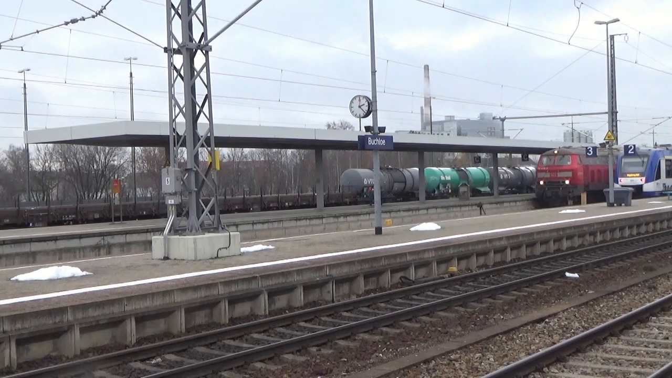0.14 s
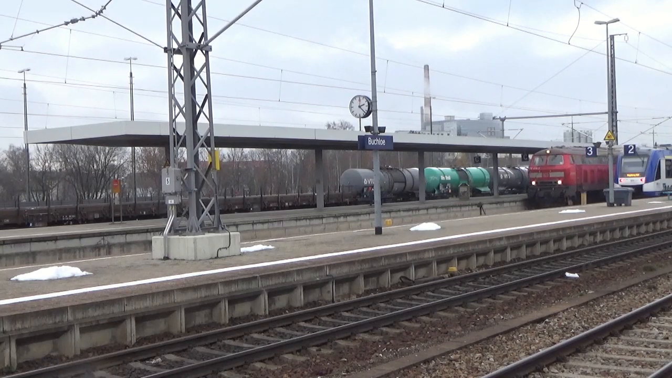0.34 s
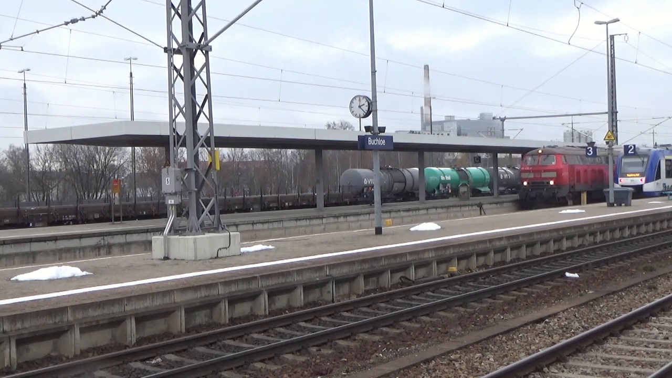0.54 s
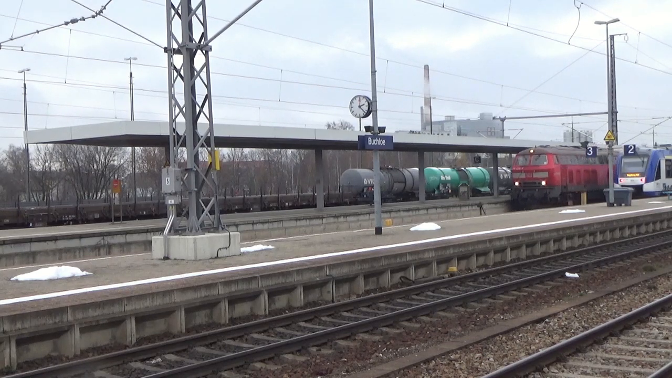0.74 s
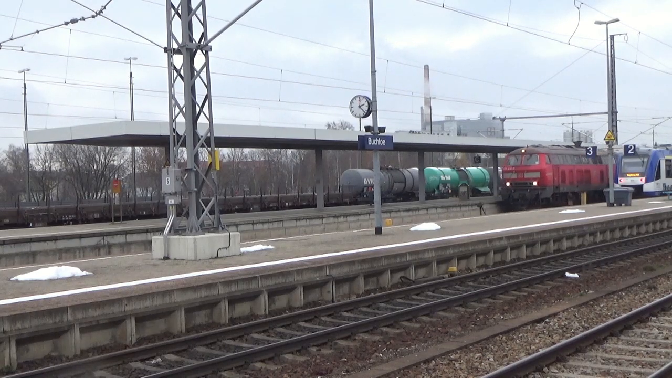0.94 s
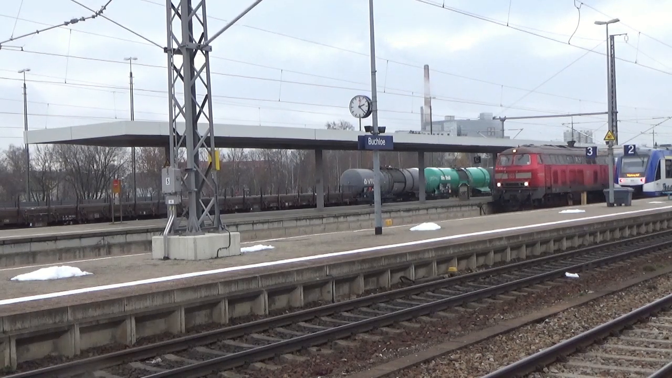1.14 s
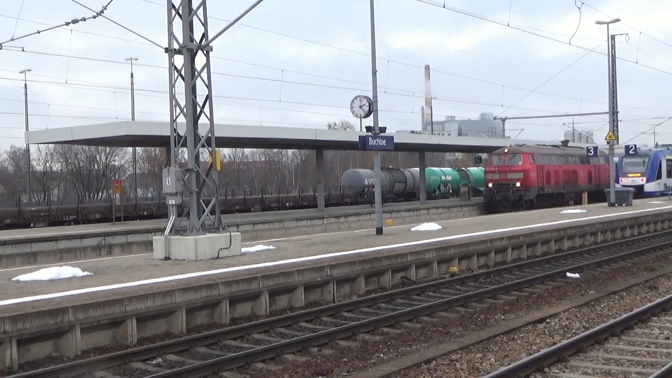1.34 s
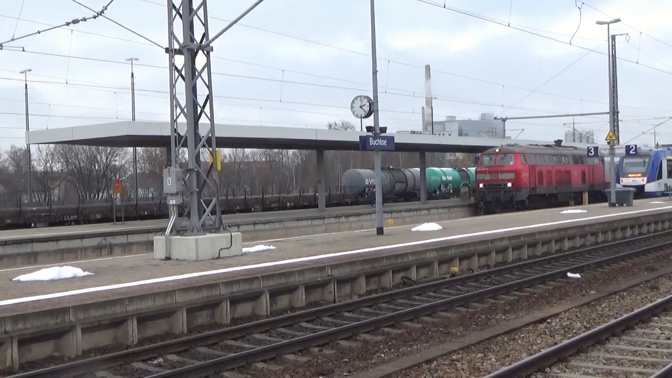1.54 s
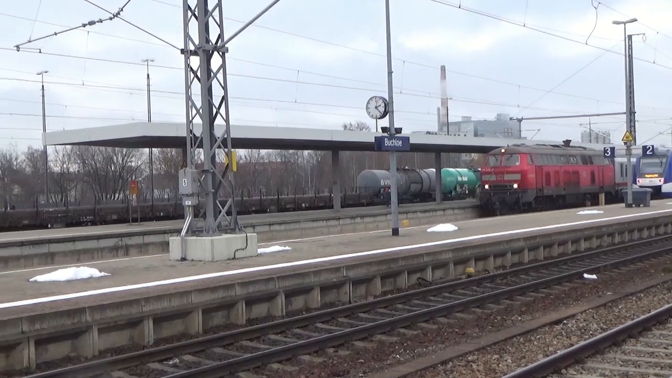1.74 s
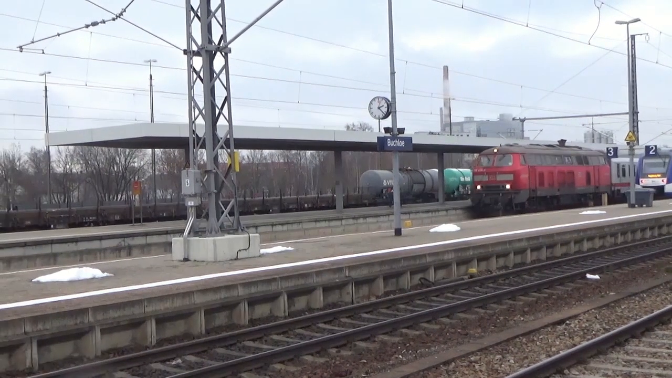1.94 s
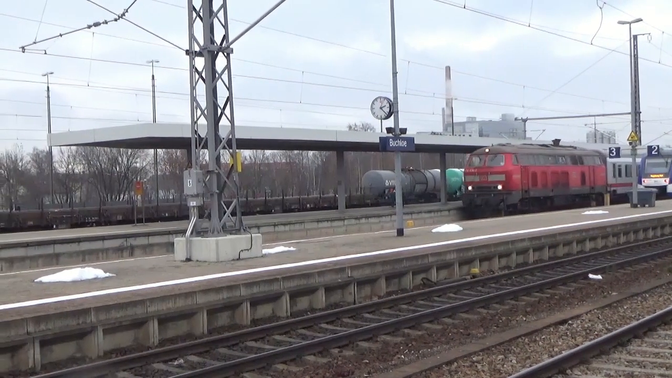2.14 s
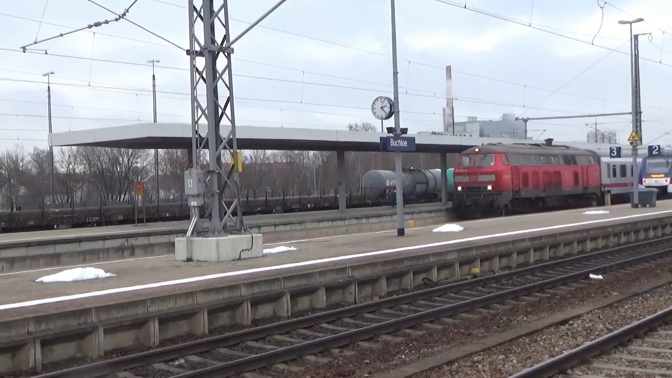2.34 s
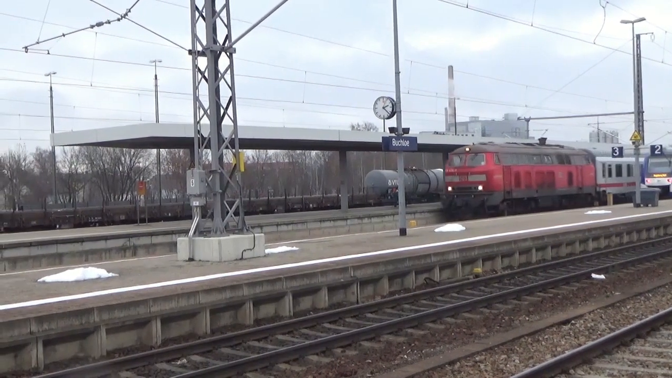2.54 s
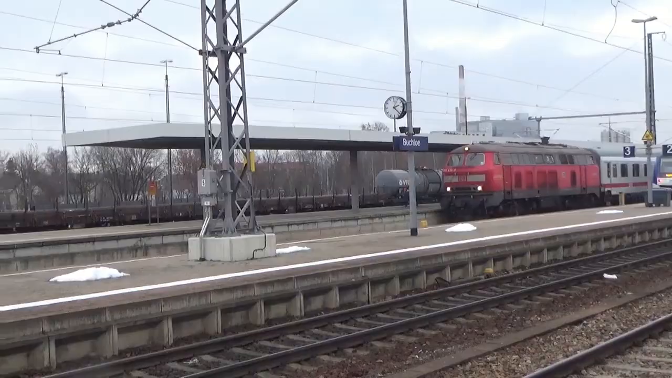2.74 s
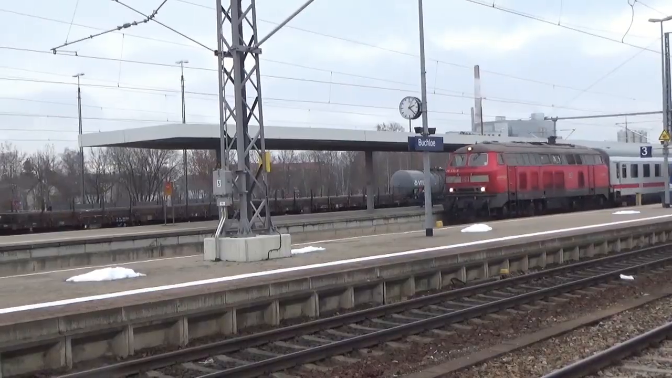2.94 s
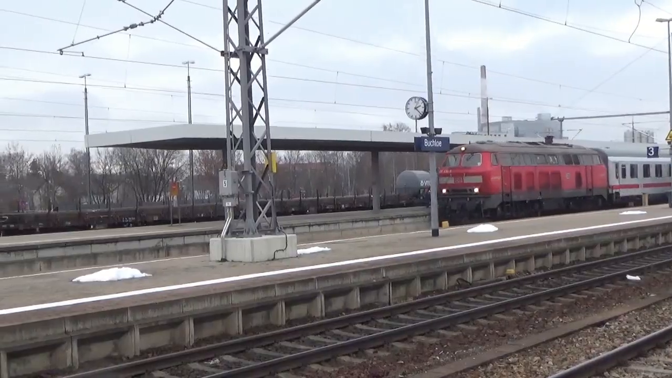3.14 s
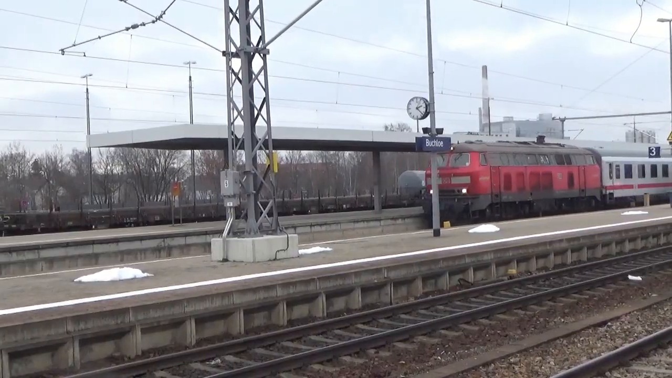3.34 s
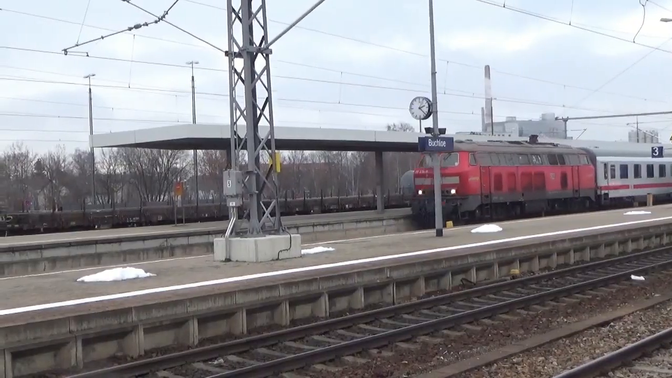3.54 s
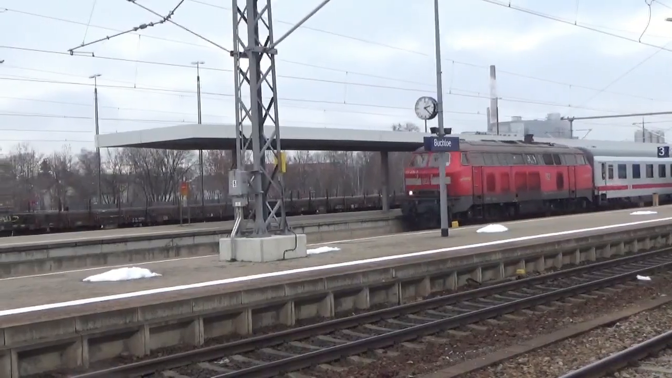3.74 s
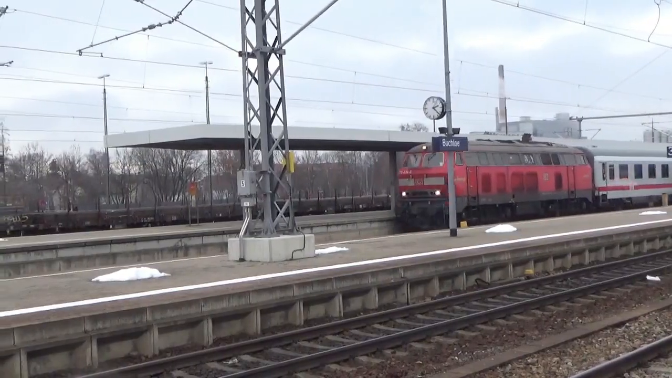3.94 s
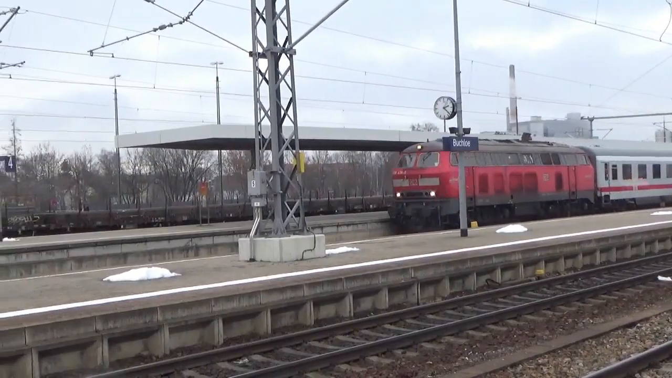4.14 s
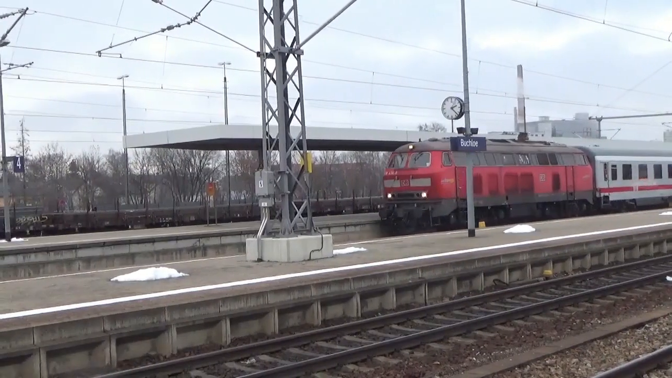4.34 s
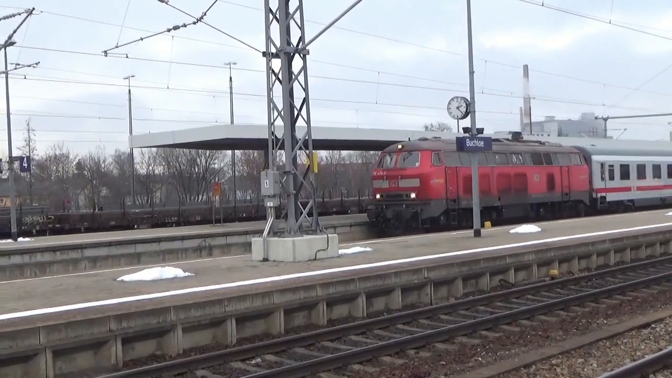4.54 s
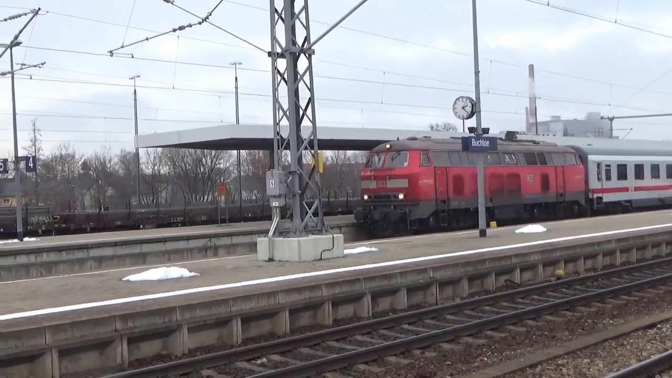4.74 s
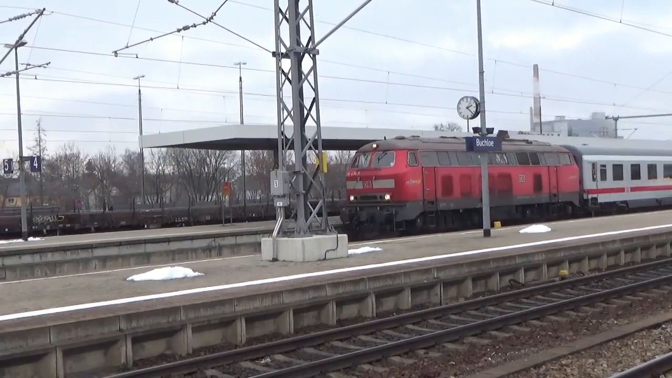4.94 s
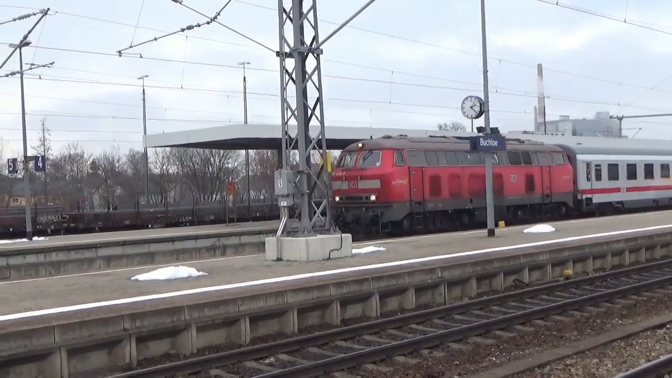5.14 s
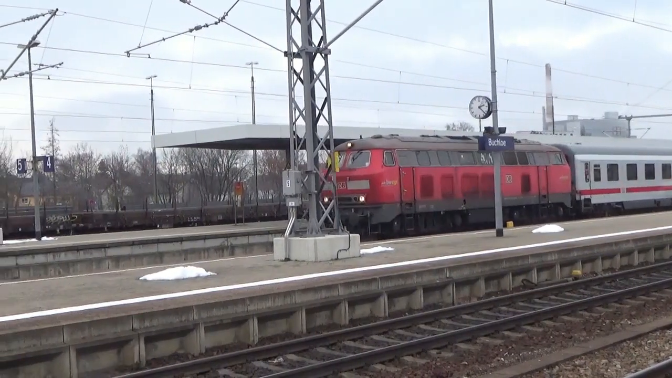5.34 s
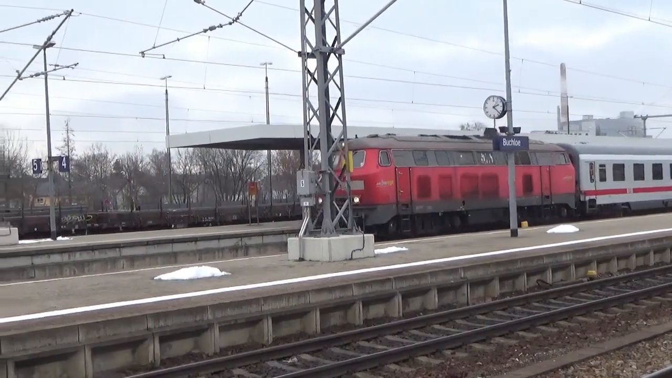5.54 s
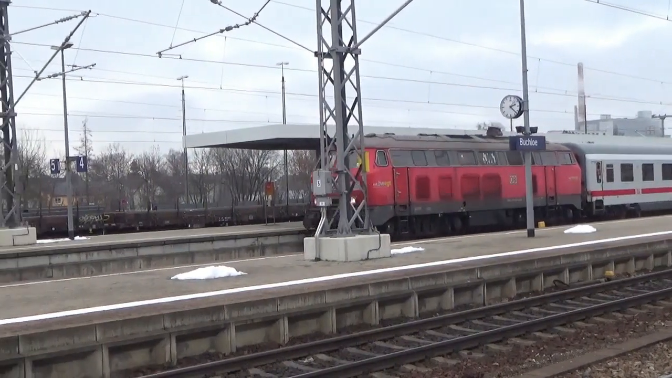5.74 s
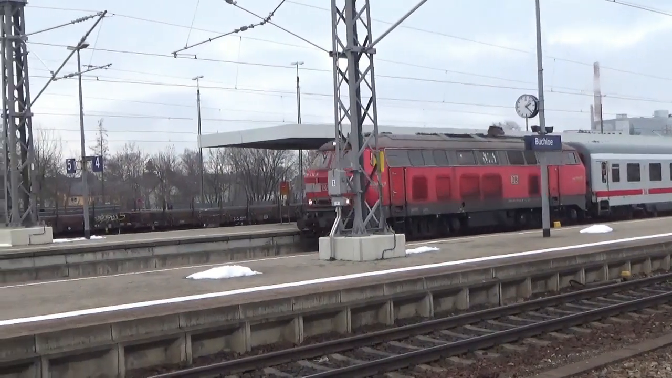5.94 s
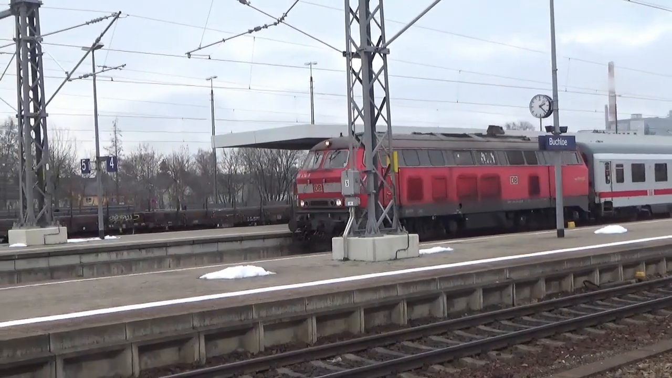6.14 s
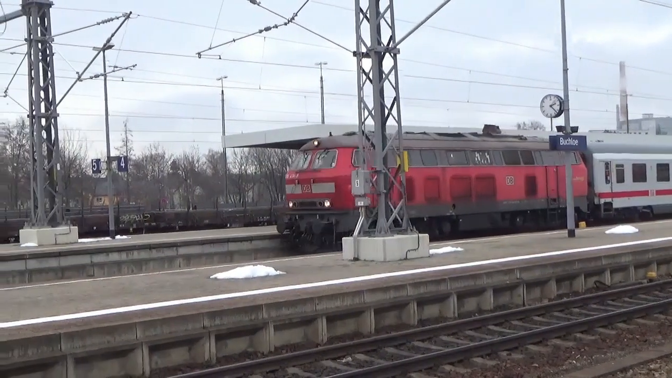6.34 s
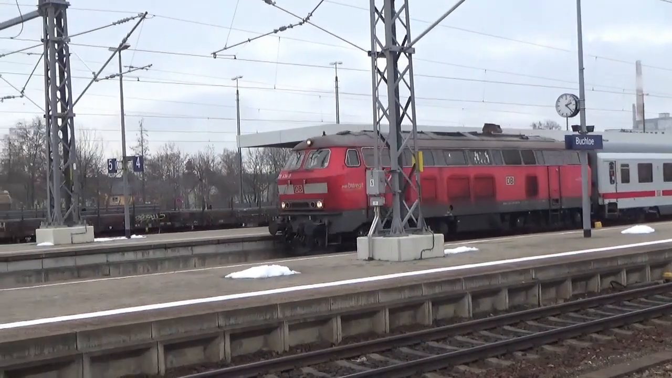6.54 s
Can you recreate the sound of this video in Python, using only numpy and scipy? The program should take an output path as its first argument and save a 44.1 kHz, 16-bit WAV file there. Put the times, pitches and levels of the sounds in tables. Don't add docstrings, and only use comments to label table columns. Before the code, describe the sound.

A diesel locomotive with coaches rolls into a station, roar growing brighter, then a piercing brake squeal flares and fades into low metallic groans.

```python
import sys
import numpy as np
from scipy import signal
from scipy.fft import rfft, irfft, next_fast_len
from scipy.io import wavfile
from scipy.ndimage import uniform_filter1d

SR = 44100
rng = np.random.default_rng(int(sys.argv[2]) if len(sys.argv) > 2 else 0)


def wav_record(signal):
    frames = np.transpose(np.atleast_2d(signal))
    bounded = np.clip(frames, -1, 1)
    quanta = np.round(bounded * 32767).astype(np.int16)
    wavfile.write(sys.argv[1], SR, quanta)


def undo_db(level):
    steps = np.asarray(level, float) / 20
    return 10 ** steps


N = 290619

# t/s, nearness/dB, treble loss at 10 kHz/dB
APPROACH = [(0, -6.5, 13), (.7, -4.5, 12.5), (1.4, -3, 12.5), (1.95, -3, 14), (2.1, -2.5, 8.5),
            (3.1, -2, 4), (3.5, -1.3, 2), (3.7, -0.5, 0), (4.6, 0.5, -0.5), (5.3, 1, 2), (6.59, 1, 4.5)]
# f/Hz, density/dB per Hz
ROAR_SPECTRUM = [(180, -37), (300, -15.5), (354, -15), (430, -4.5), (716, -2.5), (1190, -0.5), (1490, -4),
                 (1960, -4), (2850, -8), (3900, -6), (5030, -13.5), (6120, -14), (10800, -23.5),
                 (14100, -43), (22000, -120)]
# f/Hz, density/dB per Hz
RUMBLE_SPECTRUM = [(12, -61), (20, -34), (64, -13), (129, -16), (173, -4), (245, 1), (275, -1), (336, -11),
                   (400, -3), (520, -58), (880, -120)]
# f/Hz, width/Hz, level/dB
CASING_MODES = [(251, 15, -1), (273, 14.5, 2.5), (564.4, 23, 4), (639, 18.4, 6), (717, 23.3, 5.5),
                (894, 17, 4.5), (964, 21, 6), (1027, 53, 5), (1180, 42, 2), (1238, 46, 2.5),
                (1350, 28.7, 3)]
# f/Hz, width/Hz, level/dB
WHEEL_MODES = [(1795, 46, 3.5), (1927, 27.5, -1.5), (1978, 120, 6.5), (2608, 105, 5), (3136, 100, 3.5),
               (3810, 310, 4.5), (4600, 300, 2.5), (5290, 68, 4.5), (6060, 160, 4.5), (7990, 70, 2)]
# f/Hz, width/Hz, level once abreast/dB
FLANK_MODES = [(1670, 290, 4.5), (9250, 2060, 7.5), (515, 105, 4), (1003, 94, -5.5), (3800, 580, -2.5),
               (420, 74, -2)]
# t/s, share/0-1
ABREAST = [(4.6, 0.35), (5.6, 0.86), (6.59, 0.9)]
# t/s, level/dB
SURGES = [
    (1.5, 1.5),
    (3.05, 1.8),
    (4.18, 2.5),
    (5.56, 3),
    (6.14, 1.3),
    (6.56, 3),
]
# f/Hz, likeness/0-1
LIKENESS = [(30, .9), (80, 0.96), (150, 0.99), (300, 0.97), (600, 0.93), (1200, 0.89), (2400, 0.89),
            (4800, 0.9), (9600, 0.83)]
# f/Hz, phase/rad
LEFT_LEAD = [(0, 0), (1550, 0.046), (4310, 0.012), (8610, -0.55), (9130, -0.1), (10500, -0.0)]
# f/Hz, left minus right/dB
MIC_LEAN = [(60, -1), (110, 0.5), (220, -0.5), (410, -0.5), (790, -3), (1500, -1.5), (2860, -3.5),
            (5450, -0.5), (10400, -1.0)]
# t/s, squeal level/dB
PRESSURE = [
    (4.06, -38.5),
    (4.24, -24),
    (4.33, -18.5),
    (4.82, -16),
    (4.93, -22),
    (5.27, -26),
    (5.4, -31),
    (5.75, -41),
    (6.1, -51),
]
# t/s, level/dB
JERKS = [(4.235, 4.5), (4.64, 0), (4.685, -3.5), (4.74, 2.5), (4.81, -1.5), (4.84, -1), (4.985, 3),
         (5.015, -5), (5.05, 4), (5.15, 0.5), (5.25, 1.5)]
# f/Hz, width/Hz, level/dB
SCRAPE_MODES = [(6530, 320, -1.5), (3990, 600, 3), (2263, 260, -1), (5080, 890, -3.5), (7480, 60, -17),
                (6090, 200, -13)]
RIGGING_HZ = [1090, 1120, 1175, 1220, 1258, 1340]
# centre t/s, half length/s, level/dB, centre of shaken modes f/Hz
GROANS = [
    (4.614, .1, -30.5, 1115),
    (4.981, .09, -27.5, 1118),
    (5.24, .1, -30, 1180),
    (5.454, 0.092, -27, 1165),
    (5.879, .12, -29, 1225),
    (6.169, 0.057, -25, 1160),
    (6.369, 0.054, -23, 1210),
    (6.49, 0.038, -27.5, 1232),
]

ROAR_DB, RUMBLE_DB = -33.5, -42.5
RUMBLE_DB_PER_NEAR_DB, EXHAUST_DB = 0.74, 3
SURGE_S, JERK_S = 0.12, 0.014
GROAN_START_S, MURMUR_DB, MURMUR_HZ = 4.45, -35, 1196
BITE_START_S, BITE_RISE_S, BITE_HOLD_S, BITE_FALL_S, BITE_DEPTH_DB = 4.15, 0.16, 0.525, 0.19, 16
SCRAPE_DB, SCRAPE_SAG_DB_PER_S, WHINE_HZ = -31.5, -5, 6922
HALF_DB, HALF_LAG_S = -31.5, 0.08
THROB_S, THROB_TOP_S, THROB_DB = 0.19, 4.575, 3.5
UPPER_HZ, LOWER_HZ, SAG_HZ_PER_DB = 4424.5, 4359.5, 1.4
FULL_DB, SLACK_MAX_DB, LOWER_LAG_S = -17, 13, 0.18
UPPER_DB, UPPER_DB_PER_DB = -3, -0.28
LOWER_DB, LOWER_DB_PER_DB = -7, -0.7
SMEAR_DB, SMEAR_DB_PER_DB = -5, 0.25
LIMIT_DB, SQUEEZE_DB_PER_DB, RECOVER_S = -23, 0.26, 0.37


def evened(x):
    return x / np.sqrt(np.mean(abs(x) ** 2) + 1e-20)


def read(points, hz):
    f, value = np.transpose(points)
    return np.interp(np.log(hz + 1), np.log(f + 1), value)


def columns(rows, t):
    s, *rest = np.transpose(rows)
    return [np.interp(t, s, c) for c in rest]


def bumps(rows, t, half_s):
    return sum(h * np.exp(-((t - s) / half_s) ** 2) for s, h in rows)


def humps(modes, hz):
    return sum(db / (1 + (2 * (hz - f) / w) ** 2) for f, w, db in modes)


def smooth(x, width_hz):
    r = np.exp(-np.pi * width_hz / SR)
    return signal.lfilter([1 - r], [1, -r], x)


def fuzz(width_hz, tail=6.9, apart=0.42):
    noise = rng.standard_normal((2, N)) + 1j * rng.standard_normal((2, N))
    mid, side = smooth(smooth(noise, width_hz), tail * width_hz)
    return evened(mid + apart * side * np.array([[1], [-1]]))


def waver(width_hz, depth):
    return evened(1 + depth * fuzz(width_hz))


def spin(hz):
    return np.exp(2j * np.pi * np.cumsum(hz * np.ones(N)) / SR)


def limited(z, hold_s):
    power = uniform_filter1d((abs(z) ** 2).mean(0), round(hold_s * SR))
    return z / np.sqrt(abs(power) + 1e-3)


def train():
    frames, hz = N // 512 + 5, np.fft.rfftfreq(2048, 1 / SR)
    t = np.arange(frames) * 512 / SR
    near_db, air_db = columns(APPROACH, t)
    abreast = columns(ABREAST, t)[0]

    roar_db = ROAR_DB + near_db - air_db * (hz[:, None] / 9880.0) ** 2.3
    roar = undo_db(read(ROAR_SPECTRUM, hz) + humps(CASING_MODES + WHEEL_MODES, hz))
    roar = roar[:, None] / np.linalg.norm(roar[18:44]) * undo_db(roar_db)
    roar = roar * undo_db(humps(FLANK_MODES, hz)[:, None] * abreast)

    rumble_db = RUMBLE_DB + RUMBLE_DB_PER_NEAR_DB * near_db
    rumble_db = rumble_db + EXHAUST_DB * abreast ** 2 + bumps(SURGES, t, SURGE_S)
    rumble = undo_db(read(RUMBLE_SPECTRUM, hz) + humps(CASING_MODES, hz))
    rumble = rumble[:, None] / np.linalg.norm(rumble) * undo_db(rumble_db)

    a, b, c, d, patches = rng.standard_normal((frames, 1025, 5)).T
    patches = evened(uniform_filter1d(uniform_filter1d(patches, 6, 0), 9, 1))
    same = np.clip(read(LIKENESS, hz), -1, 1)[:, None]
    left = a + 1j * b
    right = same * left + np.sqrt(1 - same ** 2) * (c + 1j * d)
    right = right * np.exp(-1j * read(LEFT_LEAD, hz))[:, None]
    z = np.array([left, right]) * np.hypot(roar, rumble) * undo_db(1.07 * patches)
    return undo_db(2.0) * signal.istft(z, nperseg=2048, noverlap=1536)[1][:, :N]


def groan():
    t = np.arange(N) / SR
    centre_s, half_s, top_db, centre_hz = np.transpose(GROANS)[:, :, None]
    power = undo_db(2 * top_db) * np.exp(-((t - centre_s) / half_s) ** 2)
    murmur = undo_db(2 * MURMUR_DB)
    total = power.sum(0) + murmur
    hz = ((power * centre_hz).sum(0) + murmur * MURMUR_HZ) / total
    modes = sum(np.exp(-((f - hz) / 75) ** 2) * spin(f) * fuzz(24) for f in RIGGING_HZ)
    halo = 0.85 * spin(hz) * fuzz(200, tail=2.5)
    onset = np.clip((t - GROAN_START_S) / 0.2, 0, 1)
    return np.sqrt(2 * total) * onset * undo_db(-1.5) * limited(modes + halo, 0.075).real


def bite():
    t = np.arange(N) / SR - BITE_START_S
    end_s = BITE_RISE_S + BITE_HOLD_S + BITE_FALL_S
    grip = np.clip(np.minimum(t / BITE_RISE_S, (end_s - t) / BITE_FALL_S), -1, 1)
    grip_db = BITE_DEPTH_DB * (grip - 1)
    late_grip_db = np.roll(grip_db, round(HALF_LAG_S * SR))

    scrape_db = SCRAPE_DB + grip_db + SCRAPE_SAG_DB_PER_S * np.clip(t - BITE_RISE_S, 0, end_s)
    scrape = sum(undo_db(db) * spin(f) * fuzz(w) for f, w, db in SCRAPE_MODES)
    scrape = undo_db(scrape_db + 3.0) * scrape
    whine = undo_db(scrape_db - 11) * spin(WHINE_HZ) * waver(16, 0.7)

    throb_db = THROB_DB * np.cos(2 * np.pi * (t + BITE_START_S - THROB_TOP_S) / THROB_S)
    half_db = HALF_DB - 12 * np.clip(t - 0.45, 0, end_s) + np.minimum(grip_db, late_grip_db) + throb_db
    half = undo_db(half_db - 2.5) * spin(UPPER_HZ / 2 - 6) * limited(waver(40, 0.8), 0.05)
    return np.sqrt(2) * np.minimum(grip + 1, 1) * (half + whine + scrape).real


def squeal():
    t = np.arange(N) / SR
    pressure_db = columns(PRESSURE, t)[0]
    earlier_db = columns(PRESSURE, t - LOWER_LAG_S)[0]
    squeal_db = pressure_db + bumps(JERKS, t, JERK_S)
    slack_db = np.clip(FULL_DB - pressure_db, 0, SLACK_MAX_DB)
    late_slack_db = np.clip(FULL_DB - np.minimum(pressure_db, earlier_db), 0, SLACK_MAX_DB)

    upper_db = squeal_db + UPPER_DB + UPPER_DB_PER_DB * slack_db
    upper_hz = UPPER_HZ - SAG_HZ_PER_DB * slack_db * (t > PRESSURE[3][0])
    upper = undo_db(upper_db) * spin(upper_hz) * limited(waver(30, 0.6), 0.06)

    lower_db = squeal_db + LOWER_DB + LOWER_DB_PER_DB * late_slack_db
    lower = undo_db(lower_db) * spin(LOWER_HZ) * waver(10, 0.5)

    smear_db = squeal_db + SMEAR_DB + SMEAR_DB_PER_DB * np.minimum(slack_db, SLACK_MAX_DB / 2)
    skirt = undo_db(smear_db + 4.0) * spin(4402) * limited(fuzz(233, tail=2.4, apart=0.31), 0.037)

    tone = upper + lower + skirt
    octave = undo_db(2.5) * upper ** 2 + 0.16 * tone ** 2
    octave = octave + undo_db(squeal_db - 16.0) * spin(8740) * fuzz(340)
    onset = np.clip((t - PRESSURE[0][0]) / 0.069, 0, 1)
    return np.sqrt(2) * onset * undo_db([[-0.3], [0.3]]) * (tone + octave).real


def scene():
    return train() + groan() + bite() + squeal()


def top_cut(x):
    return signal.sosfilt(signal.butter(12, 10970, fs=SR, output="sos"), x)


def record(dry):
    power_db = 10 * np.log10(smooth((dry ** 2).mean(0), 1 / RECOVER_S) + 1e-12)
    ducked = dry / undo_db(SQUEEZE_DB_PER_DB * np.maximum(power_db - LIMIT_DB, 0))
    size = next_fast_len(N)
    hz = np.fft.rfftfreq(size, 1 / SR)
    lean = undo_db(read(MIC_LEAN, hz) / 2 * np.array([[1], [-1]]))
    lean = lean * hz ** 2 / (hz ** 2 + 45 ** 2)
    heard = irfft(rfft(ducked, size) * lean, size)[:, :N]
    ceiling = 0.9
    mix = ceiling * np.tanh(heard / ceiling)
    return top_cut(mix)


dry = scene()
out = record(dry)
wav_record(out)
```